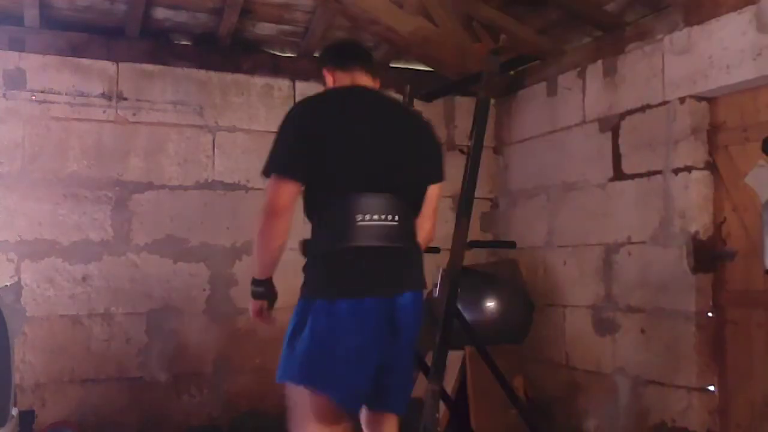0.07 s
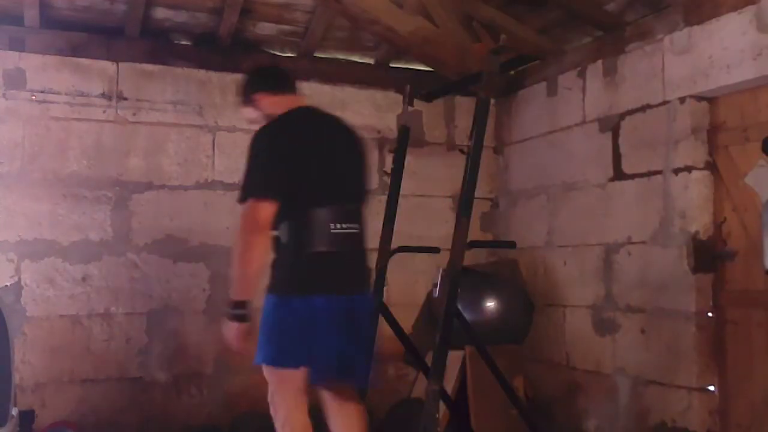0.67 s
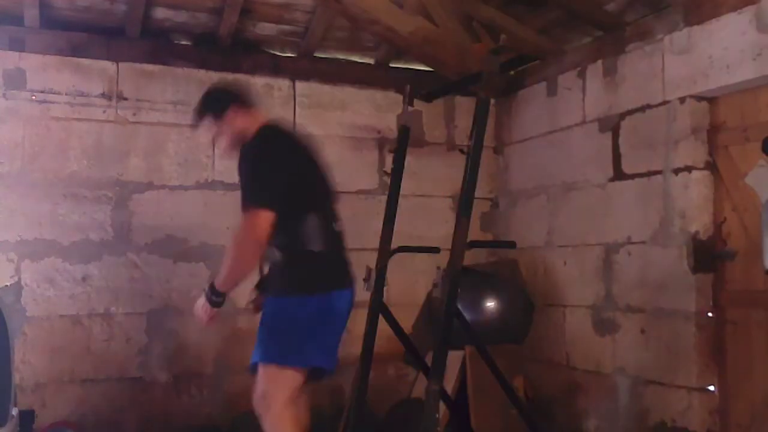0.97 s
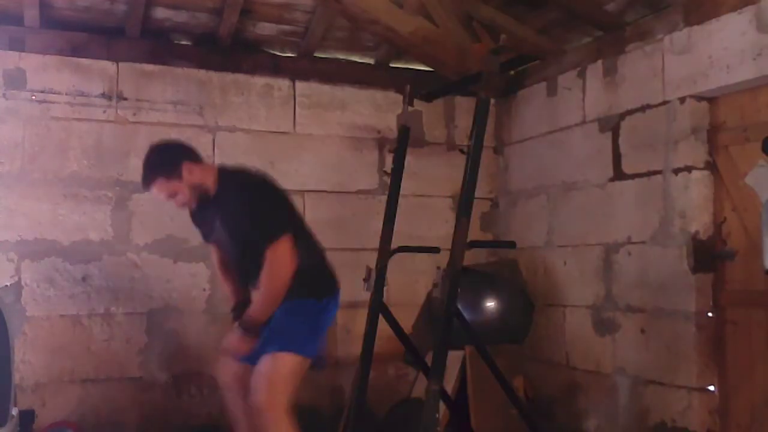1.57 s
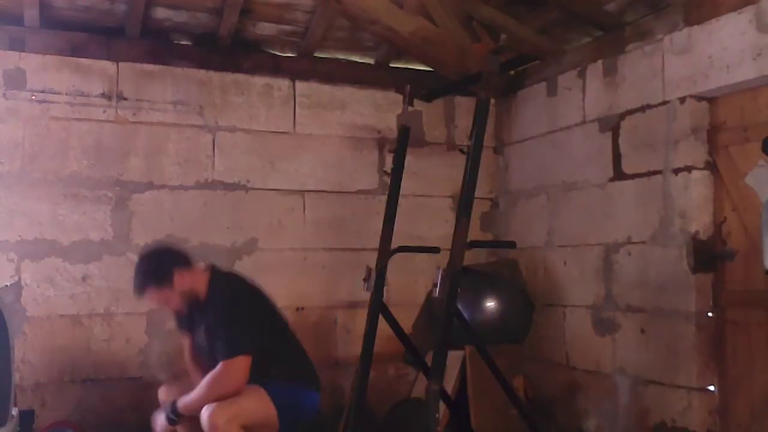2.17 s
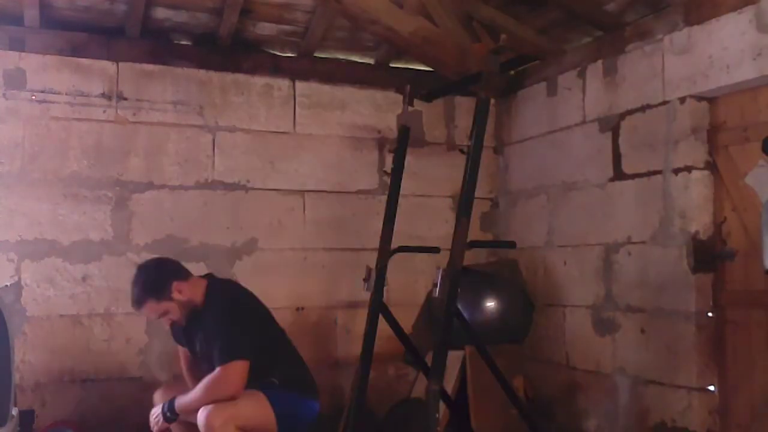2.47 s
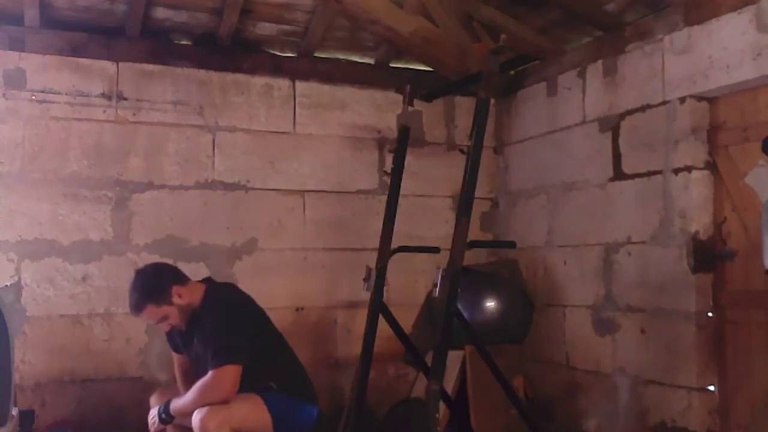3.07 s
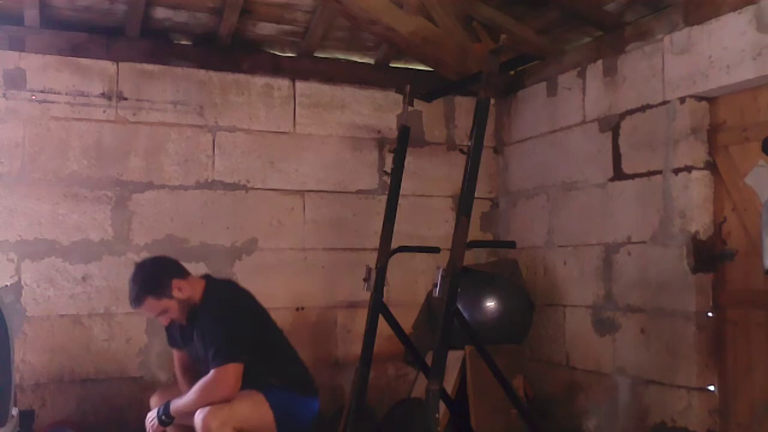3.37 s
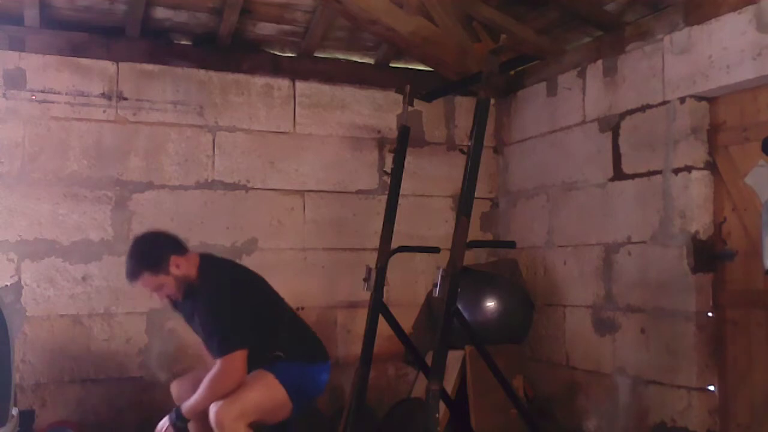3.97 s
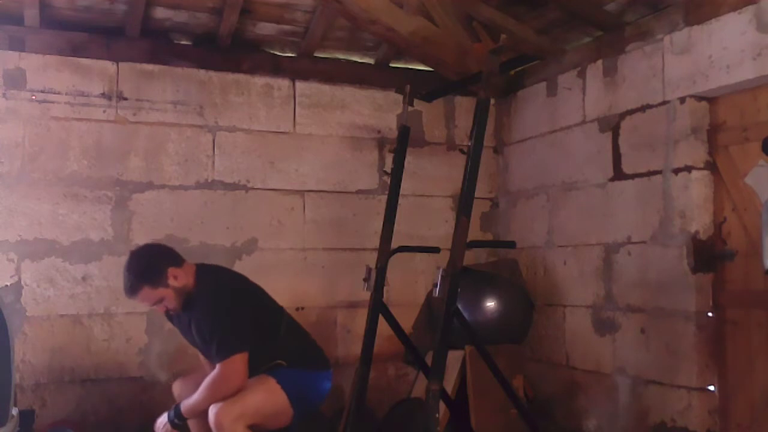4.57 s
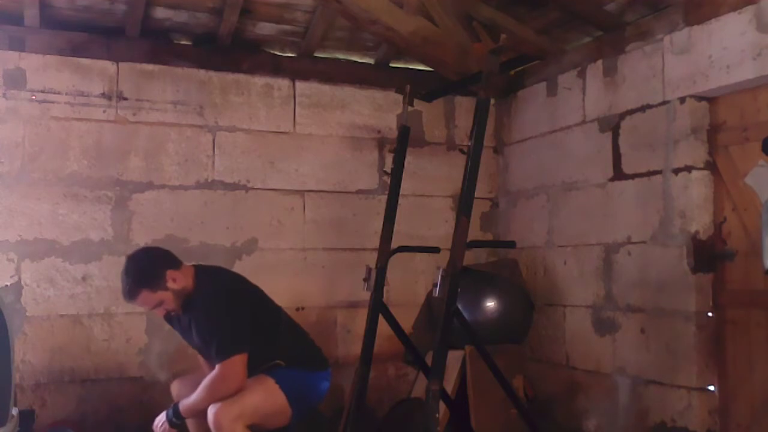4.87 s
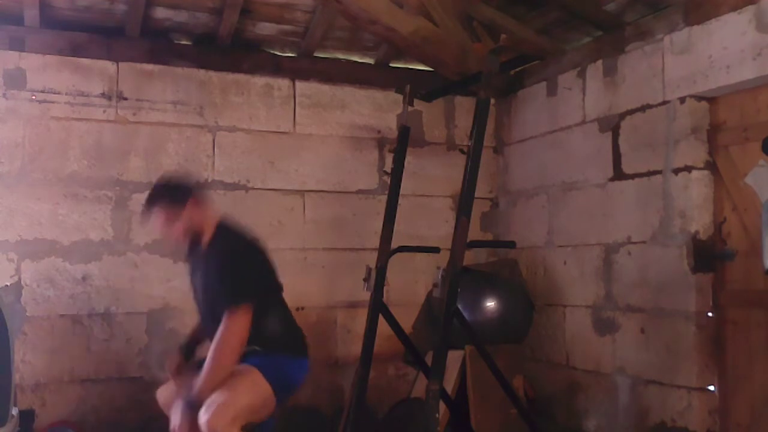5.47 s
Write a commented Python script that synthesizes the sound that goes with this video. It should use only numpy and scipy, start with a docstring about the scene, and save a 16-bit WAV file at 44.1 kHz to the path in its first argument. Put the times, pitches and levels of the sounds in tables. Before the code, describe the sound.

Shoes thud and scuff on a gritty concrete floor during the first two seconds, clearest at about 0.5, 1.3 and 1.8 seconds, with a few faint clinks of steel chain. A sharper clink comes at 2.6 seconds. From 3 to 3.5 seconds the chain is fed through a weight plate: the links clink hard and bright, loudest at 3.2, while the plate rings briefly, scrapes and knocks dully on the floor. After a few small ticks, a snap hook rings at about 4.3 seconds. Between 4.6 and 5.4 seconds the chain slides over the rim of the plate's hole in four short pulls, with more clinks and a soft knock. A faint, wavering low hum like a distant engine and a soft outdoor rush continue throughout. Everything is heard in mono from one spot, with the short reverberation of a small block-walled shed.

```python
"""A small block-walled shed with a gritty concrete floor, heard from one spot on a mono microphone.
First shoes scuff and a lifter squats down to a weight plate, with a few light clinks of steel chain.
Around 3 s the chain is fed through the plate: links clink hard, the plate knocks and scrapes.
Just after 4 s the snap hook rings, then the chain is pulled over the rim of the hole four times.
A faint wavering hum and a soft outdoor rush lie underneath throughout."""
import sys
import numpy as np
from scipy import signal
from scipy.fft import rfft, irfft, next_fast_len
from scipy.io import wavfile
from scipy.ndimage import map_coordinates

SR = 44100
rng = np.random.default_rng(int(sys.argv[2]) if len(sys.argv) > 2 else 0)


def to_wav(sig):
    """Store sig (one row per channel, or 1-D mono) as 16-bit WAV at the path in sys.argv[1].

    Samples outside -1..1 are clipped; the rate is SR.
    """
    pcm = np.clip(np.atleast_2d(sig), -1, 1) * 32767
    pcm = np.round(pcm).astype(np.int16)
    wavfile.write(sys.argv[1], SR, pcm.T)  # frames by channels


N = 246078
T = np.arange(int(.6 * SR)) / SR  # time within one contact [s]

# modes of the steel links, the snap hook and the weight plate: (frequency [Hz], level [dB], t60 [s])
LINK_MODES = [(6148, -12, .2), (6293, -10, .25), (6562, -8, .25), (6864, -13, .2), (7780, -7, .12),
              (8300, -9, .15), (8576, -7, .15), (9044, -1, .24), (9114, -4, .2), (9238, -4, .2),
              (9464, -1, .22), (9609, -3, .2), (9808, -4, .2), (9876, -5, .2), (10013, -3, .22),
              (10347, -9, .17), (10490, -7, .17), (10724, -2, .22), (10800, -4, .17), (11375, -9, .17),
              (11702, -4, .2), (11741, -4, .2), (11860, -9, .17), (12457, -13, .17), (12995, -12, .15),
              (13460, -17, .22), (14260, -12, .17), (14750, -16, .17), (15579, -15, .12)]
HOOK_MODES = [(3369, 0, .36), (3433, 0, .36), (3521, -6, .2), (3677, -3, .22), (3829, 0, .24),
              (3978, -5, .2), (4032, -4, .2), (4296, -10, .17), (4474, -12, .17)]
PLATE_MODES = [(544, -5, .3), (1130, 2, .1), (1176, -1, .35), (1217, -1, .4), (1430, -7, .4),
               (1583, -17, .25), (1884, -13, .3), (2517, -13, .3), (3070, -13, .22)]
# struck itself, the hook sounds its lowest pair: (hook over link [dB], main note [Hz])
HOOK_MAIN_NOTE = [(0, 3850), (6, 3460)]
# harder contacts reach higher: (link level [dB], gain above 12 kHz [dB])
HARDNESS_TREBLE = [(-52, -18), (-30, 1)]
# click of steel on steel: (frequency [Hz], level [dB])
CLICK_SPECTRUM = [(200, -41), (600, 7), (1150, -28), (1700, 4.5), (2800, 0), (3850, 2), (5200, -3),
                  (6450, -2), (7200, -1), (8100, 0), (9500, 7), (11700, 1.5), (13000, 5), (16000, -8)]
# only a blow on the plate gives a full click: (plate over click [dB], gain below 2.5 kHz [dB])
CLICK_FULLNESS = [(-23, -7.5), (-1.5, -1)]
# chain contacts: (time [s], link level [dB], hook level [dB], plate level [dB], link note [Hz])
CHAIN_CONTACTS = [(0.067, -53.5, -82, -65, 10300), (0.138, -52.5, -67, -72, 10200),
                  (1.121, -46.5, -48.5, -64, 8580), (1.681, -47.5, -52, -53, 9800),
                  (2.561, -35.5, -52, -52.5, 10730), (2.876, -46.5, -53.5, -62, 9500),
                  (3.053, -27, -35.5, -36.5, 9600), (3.083, -27.5, -62, -41.5, 10770),
                  (3.219, -34, -36.5, -57, 12000), (3.225, -19, -38, -31.5, 9300),
                  (3.414, -24.5, -48, -44, 10000), (3.498, -43.5, -46, -39.5, 9430),
                  (3.754, -46, -55, -72, 7780), (4.138, -56.5, -53, -65, 9490),
                  (4.228, -42, -45, -72, 10770), (4.274, -50.5, -52, -72, 8300),
                  (4.340, -42.5, -29.5, -54, 9800), (4.640, -35.5, -41, -36.5, 11700),
                  (4.668, -35, -38.5, -43, 9340), (4.681, -39.5, -37.5, -57, 11630),
                  (4.733, -31, -39, -43, 9670), (4.864, -42.5, -41, -56, 8800),
                  (4.990, -45.5, -44.5, -48, 8810), (5.295, -33.5, -47.5, -44, 9600),
                  (5.422, -37.5, -47.5, -44.5, 10780)]


def chain():
    """Each contact is a hard click that rings the links, the hook and the plate they hang on."""
    out = np.zeros(N)
    spread = 1 - np.exp(-T / .0009)  # the blow runs down the chain in a millisecond or two
    for s, link_db, hook_db, plate_db, link_hz in CHAIN_CONTACTS:
        click_db = .57 * link_db + .43 * hook_db - 2
        top_db = lookup(HARDNESS_TREBLE, link_db)
        body_db = lookup(CLICK_FULLNESS, plate_db - click_db)
        hook_hz = lookup(HOOK_MAIN_NOTE, hook_db - link_db)
        hardness = lambda hz: top_db * np.clip((hz - 11800) / 600, 0, 1)
        link_colour = lambda hz: hardness(hz) + 10 * bump(hz, link_hz, width_hz=150)
        hook_colour = lambda hz: 8 * bump(hz, hook_hz, width_hz=100)
        links = struck_steel(LINK_MODES, scatter_db=3, wet_db=-8, ping_db=2, boost=link_colour)
        hook = struck_steel(HOOK_MODES, scatter_db=1.5, wet_db=-4, ping_db=6, boost=hook_colour)
        plate = struck_steel(PLATE_MODES, scatter_db=1.5, wet_db=-6, ping_db=7)
        add(out, s, amp(link_db - 9.5) * links + amp(hook_db - 9) * hook + amp(plate_db - 8.5) * plate)
        # links pressed together ring only briefly
        neighbours = ring(LINK_MODES, scatter_db=4, boost=link_colour, detune=.012)
        add(out, s, amp(link_db - 13) * in_shed(neighbours * spread * decay(.02), wet_db=4))
        body = lambda hz: body_db * np.clip((3000 - hz) / 700, 0, 1)
        click = noise(CLICK_SPECTRUM, boost=lambda hz: body(hz) + hardness(hz) + uneven(hz, depth_db=2.5))
        add(out, s, amp(click_db - 4) * in_shed(click * spread * decay(.009), wet_db=11.5))
    return out


def struck_steel(modes, scatter_db, wet_db, ping_db, boost=lambda hz: 0):
    """The contact chokes a strong first ping; a weaker ring lingers, damped by the hand."""
    grip_s, choke_s = .4, .03
    envelope = decay(grip_s) + amp(ping_db) * decay(choke_s)
    return in_shed(ring(modes, scatter_db, boost) * envelope, wet_db)


def ring(modes, scatter_db, boost=lambda hz: 0, detune=0):
    """Damped modes, excited at new strengths by each contact; detune sets unlike links apart."""
    chance = rng.standard_normal((len(modes), 3))
    out = np.zeros(len(T))
    for (hz, db, t60), (strength, phase, tuning) in zip(modes, chance):
        tone = np.sin(2 * np.pi * (hz * (1 + detune * tuning) * T + phase))
        out += amp(db + scatter_db * strength + boost(hz)) * decay(t60) * tone
    return out


def uneven(hz, depth_db):
    """A random gain in dB along frequency: each blow favours other parts of the steel."""
    knots = np.linspace(0, SR / 2, 56)
    return depth_db * np.interp(hz, knots, rng.standard_normal(len(knots)))


# pulls of the chain through the plate: (time of the fastest moment [s], level [dB])
CHAIN_PULLS = [(4.655, -48), (4.76, -44.5), (5.035, -44), (5.32, -51)]


def chain_drag():
    """Links slide over the rim of the hole, ringing plate and hook with tiny ticks at each pull."""
    rise_db_per_s, fall_db_per_s, ticks_per_s = 162, 104, 300
    now = np.arange(N) / SR
    sliding = sum(amp(db - np.maximum(rise_db_per_s * (s - now), fall_db_per_s * (now - s)))
                  for s, db in CHAIN_PULLS)
    ticks = (rng.random(N) < ticks_per_s / SR) * rng.standard_normal(N)
    steel = (ring(PLATE_MODES, scatter_db=1) + amp(-14) * ring(HOOK_MODES, scatter_db=1)) * decay(.3)
    return sliding * amp(-3) * unit(signal.fftconvolve(ticks, steel)[:N])


# rasp of a slide and the grit cracking under it: (frequency [Hz], level [dB])
RASP_SPECTRUM = [(300, -29), (700, -4), (1500, -2), (3000, -4), (4200, -11.5), (6000, -16.5), (10000, -32)]
GRIT_SPECTRUM = [(2500, -36), (5000, 2), (8000, 11.5), (11000, 8.5), (13000, 4), (16000, -7.5)]
# soles and plate rubbing on the floor: (time [s], level [dB], length [s], hollow resonance [dB])
FLOOR_SCUFFS = [(0.494, -39, 0.069, -0.5), (0.854, -57.5, 0.042, 13), (1.259, -43.5, 0.11, 3),
                (1.364, -49, 0.044, 10), (1.686, -54.5, .04, 8), (1.807, -40, 0.032, 2.5),
                (2.024, -56.5, 0.039, 3), (3.08, -36.5, 0.051, 11), (3.234, -41.5, 0.037, 12)]


def scuffs():
    """Sand rolls and cracks under a short slide: a rasp with one hollow resonance, sharp grit on top."""
    rise_s, hollow_hz = .007, 2925
    out = np.zeros(N)
    for s, db, length, hollow_db in FLOOR_SCUFFS:
        grains = amp(4.6 * np.interp(T, T[::64], rng.standard_normal(len(T[::64]))))
        stroke = grains * decay(2 * length) * (1 - np.exp(-T / rise_s))
        rasp = noise(RASP_SPECTRUM, boost=lambda hz: hollow_db * bump(hz, hollow_hz, width_hz=190))
        add(out, s, amp(db - 3) * in_shed(rasp * stroke, wet_db=2))
        add(out, s, amp(db - 11) * in_shed(noise(GRIT_SPECTRUM) * stroke, wet_db=2.5))
    return out


# thump and clack on the concrete: (frequency [Hz], level [dB])
THUMP_SPECTRUM = [(70, -17), (170, 8), (260, 9.5), (400, -4.5), (800, -18), (2500, -53.5)]
CLACK_SPECTRUM = [(200, -40), (500, 6.5), (850, 6.5), (1150, 2.5), (1500, -11.5), (2200, -7.5), (3500, -14),
                  (7000, -38)]
# a harder knock clacks higher: (clack level [dB], main note [Hz])
CLACK_MAIN_NOTE = [(-36, 520), (-35, 900)]
# footfalls and dull knocks of the plate: (time [s], thump level [dB], clack level [dB])
FLOOR_KNOCKS = [(0.004, -61, -43), (0.039, -52, -45.5), (0.499, -75, -34.5), (0.587, -50.5, -44),
                (1.135, -46.5, -48), (1.344, -56, -47), (1.814, -43.5, -36), (3.222, -44, -55),
                (3.436, -41.5, -50), (3.467, -45, -46.5), (4.678, -49, -50.5), (5.438, -64, -43.5)]


def knocks():
    """Weight meets the concrete floor: a low thump and a short hollow clack."""
    out = np.zeros(N)
    for s, thump_db, clack_db in FLOOR_KNOCKS:
        clack_hz = lookup(CLACK_MAIN_NOTE, clack_db)
        thump = noise(THUMP_SPECTRUM, boost=lambda hz: 7 * bump(hz, centre_hz=230, width_hz=24))
        clack = noise(CLACK_SPECTRUM, boost=lambda hz: 7 * bump(hz, clack_hz, width_hz=80))
        add(out, s, amp(thump_db - 7.5) * in_shed(thump * decay(.088), wet_db=7.5))
        add(out, s, amp(clack_db - 4.5) * in_shed(clack * decay(.07), wet_db=2.5))
    return out


# reverberation of the block walls: (frequency [Hz], t60 [s])
SHED_DECAY = [(150, 0.17), (1000, 0.34), (3000, 0.35), (9000, 0.27), (15000, 0.16)]


def in_shed(x, wet_db):
    """The microphone hears the direct sound, then the bare walls; rms 1 over the first 30 ms."""
    hz, t, spectra = signal.stft(rng.standard_normal(len(T)), SR, nperseg=256)
    fading = np.exp(-np.log(1000) * t / along(SHED_DECAY, hz)[:, None])
    tail = signal.istft(spectra * fading, SR, nperseg=256)[1][:len(T)]
    tail *= 1 - np.exp(-T / .0034)
    heard = x + amp(wet_db) * signal.fftconvolve(x, tail / np.linalg.norm(tail))[:len(T)]
    return heard / np.sqrt(np.mean(heard[:int(.03 * SR)] ** 2))


# the hum sinks slowly, picks up and sinks again: (time [s], frequency [Hz], level [dB])
HUM_DRIFT = [(0.1, 77.5, -57.5), (0.95, 81, -63), (1.3, 68.1, -64), (1.8, 70.35, -53), (2.55, 61.5, -61),
             (3.1, 55.3, -59.5), (4.15, 55, -64), (4.4, 87, -61.5), (5.5, 77, -63)]
# rush from outdoors: (time [s], level [dB])
RUSH_LEVEL = [(0.05, -53.5), (0.29, -57.5), (2.96, -59), (3.28, -56), (3.89, -57.5), (4.98, -53.5),
              (5.55, -54)]
# steady room tone, a low rumble with faint hiss: (frequency [Hz], level [dB])
AIR_SPECTRUM = [(25, -2), (40, -29), (53, 3.5), (70, -1), (90, -4), (115, -11), (240, -11.5), (400, -14),
                (800, -11.5), (1100, -17.5), (1500, -39), (2300, -31), (6000, -33), (15800, -34.5)]


def background():
    """A low hum drifts like a distant engine, over a faint drone, the outdoor rush and room tone."""
    hum_hz, hum_db = curves(HUM_DRIFT)
    rush_db, = curves(RUSH_LEVEL)
    tone = lambda hz: np.sin(2 * np.pi * np.cumsum(hz) / SR)
    hum = amp(hum_db + .5 + .58 * wobble(4.1)) * tone(hz=hum_hz + wobble(6.92))
    drone = amp(-68 + 2.7 * wobble(4.6)) * tone(hz=177 + 2.43 * wobble(9.2))
    rush = noise([(100, -25.5), (300, -6), (650, -4), (1100, -10.5), (2000, -17), (6000, -24)], size=N)
    rush *= amp(rush_db - .38 + 1.75 * wobble(7))
    return hum + drone + rush + amp(-56) * noise(AIR_SPECTRUM, size=N)


def amp(db):
    """Decibels to gain."""
    return 10 ** (np.asarray(db) / 20)


def unit(x):
    """Scale to rms 1."""
    return x / np.sqrt(np.mean(x ** 2) + 1e-20)


def lookup(points, x):
    """Interpolate (x, value) points."""
    return np.interp(x, *np.transpose(points))


def along(points, hz):
    """Interpolate (frequency [Hz], value) points on a log axis."""
    knots_hz, values = np.transpose(points)
    return np.interp(np.log(hz + 1), np.log(knots_hz), values)


def curves(rows):
    """One value per sample for each column after the time."""
    s, *columns = np.transpose(rows)
    return [np.interp(np.arange(N) / SR, s, column) for column in columns]


def wobble(rate):
    """A smooth random curve, rate knots a second."""
    return map_coordinates(rng.standard_normal(400), [np.arange(N) * rate / SR], mode="wrap")


def filtered(x, gain):
    """x times a gain that depends on frequency."""
    size = next_fast_len(len(x) + 4096)
    return irfft(rfft(x, size) * gain(np.fft.rfftfreq(size, 1 / SR)), size)[:len(x)]


def bump(hz, centre_hz, width_hz):
    """A resonance curve of height 1."""
    return 1 / (1 + ((hz - centre_hz) / width_hz) ** 2)


def noise(spectrum, size=len(T), boost=lambda hz: 0):
    """Coloured noise of rms 1, with an optional extra dB curve."""
    return unit(filtered(rng.standard_normal(size), lambda hz: amp(along(spectrum, hz) + boost(hz))))


def decay(t60):
    """Fall by 60 dB in t60 seconds."""
    return np.exp(-np.log(1000) * T / t60)


def add(track, s, sound):
    """Mix a sound in at time s."""
    start = round(s * SR)
    track[start:start + len(sound)] += sound[:N - start]


def scene():
    """Everything in the shed, heard from one spot."""
    return (chain() + chain_drag() + scuffs() + knocks() + background())[None]


def record(dry):
    """The camera's microphone channel has a steep band limit and a small constant offset."""
    top_hz, offset = 15950, .021
    return filtered(dry[0], lambda hz: hz < top_hz)[None] + offset


dry = scene()
out = record(dry)
to_wav(out)
```